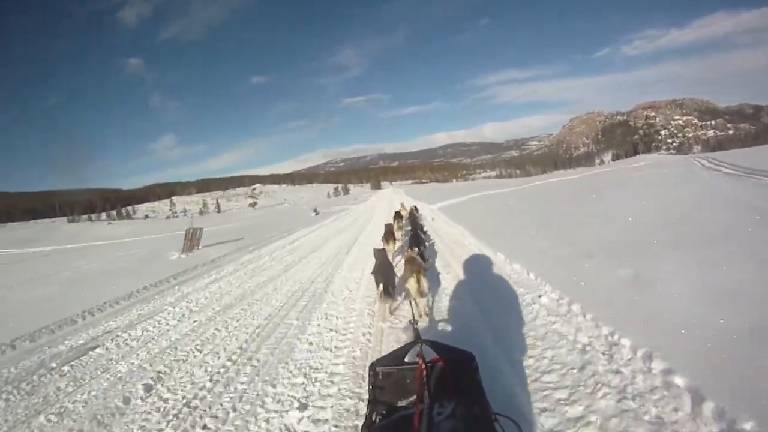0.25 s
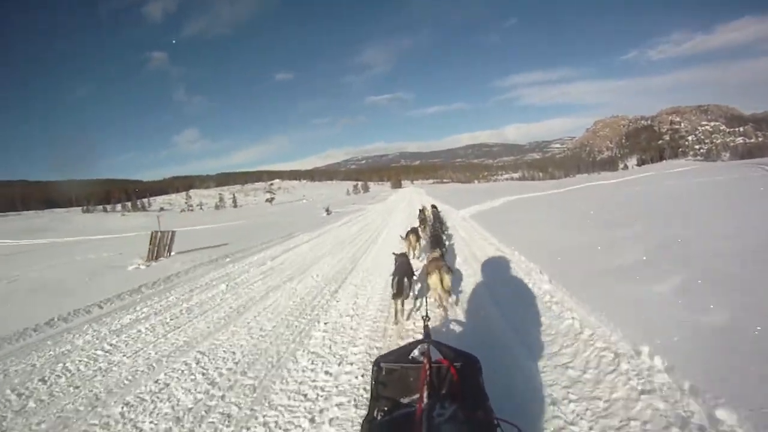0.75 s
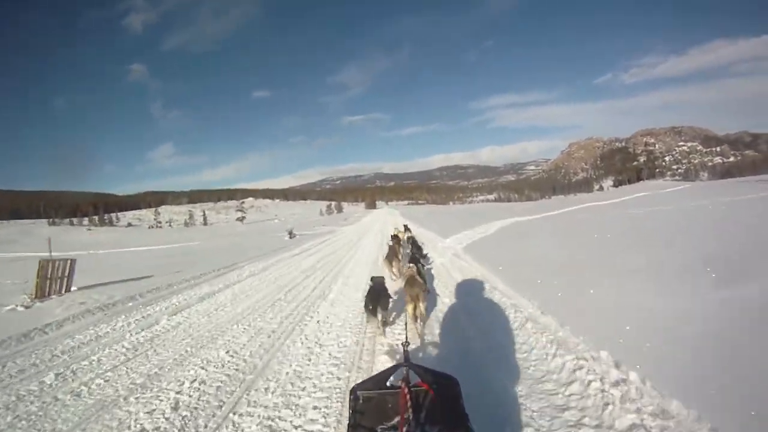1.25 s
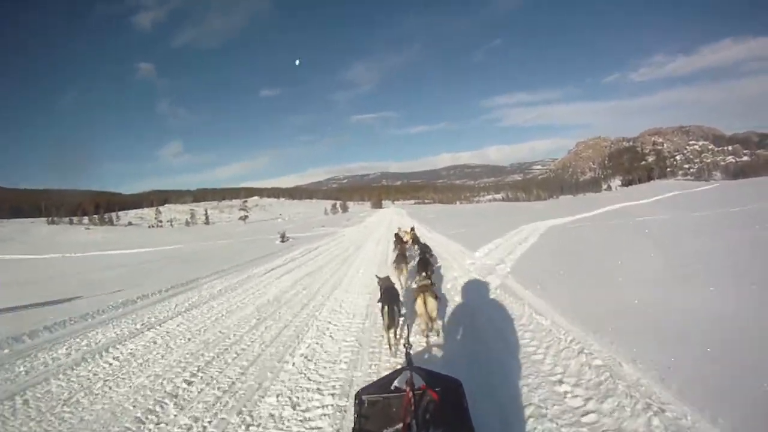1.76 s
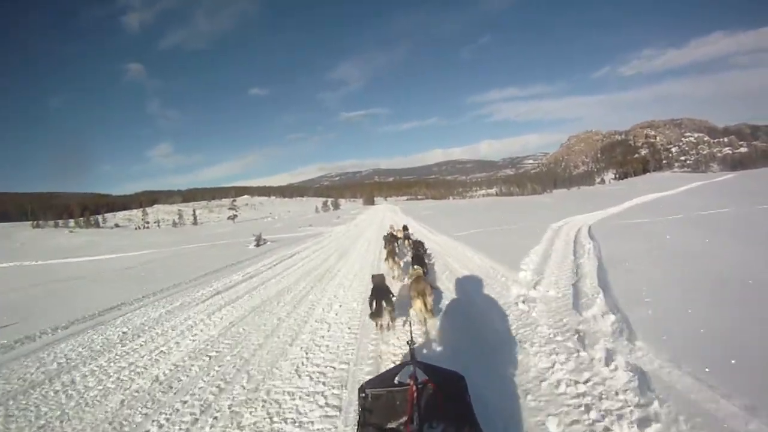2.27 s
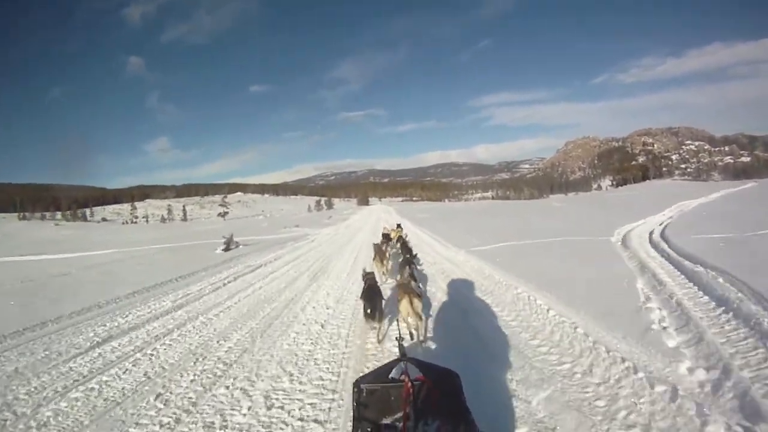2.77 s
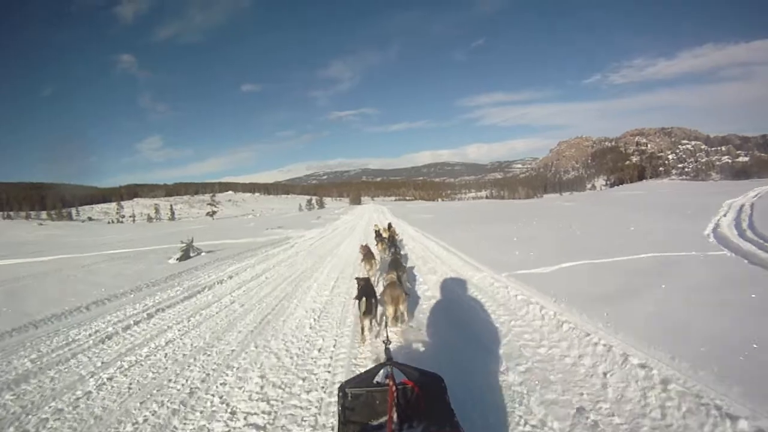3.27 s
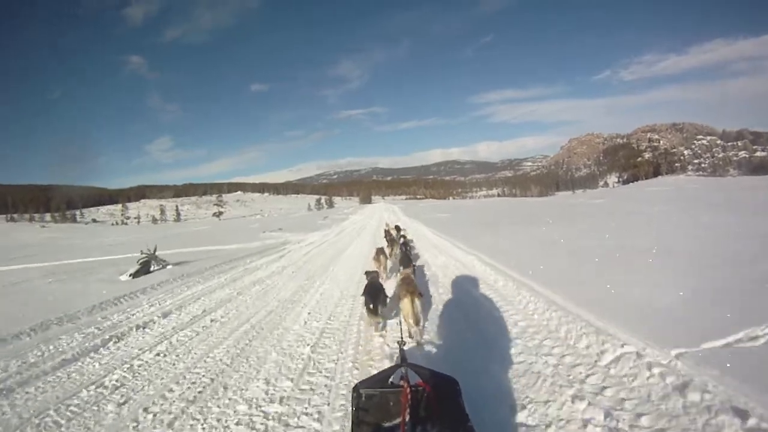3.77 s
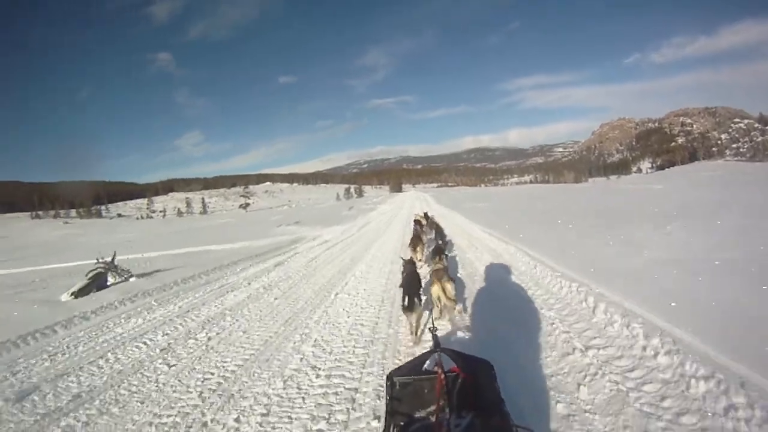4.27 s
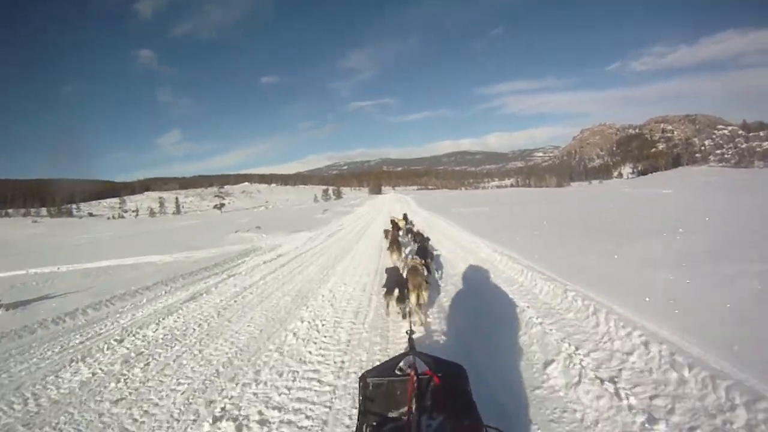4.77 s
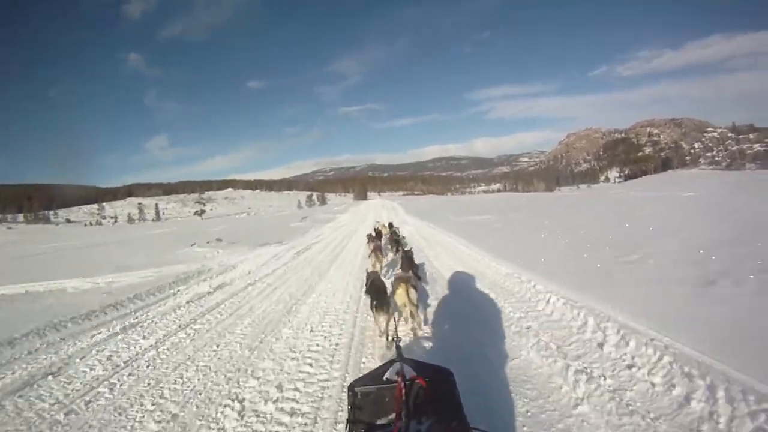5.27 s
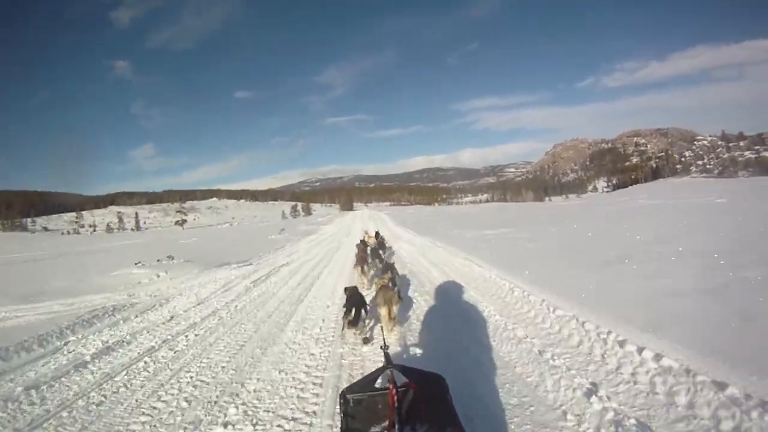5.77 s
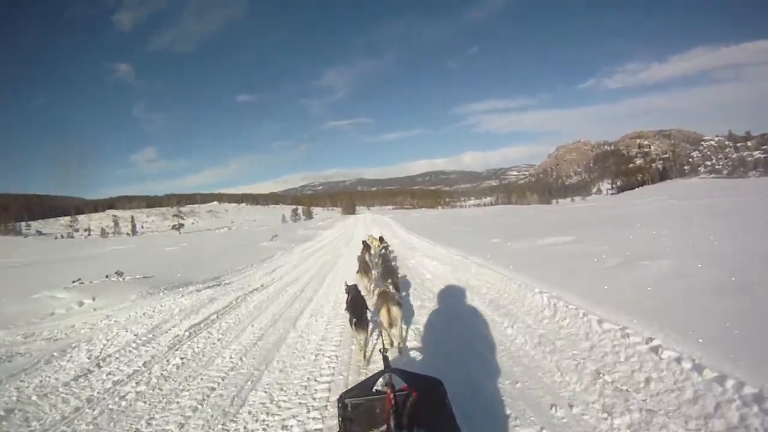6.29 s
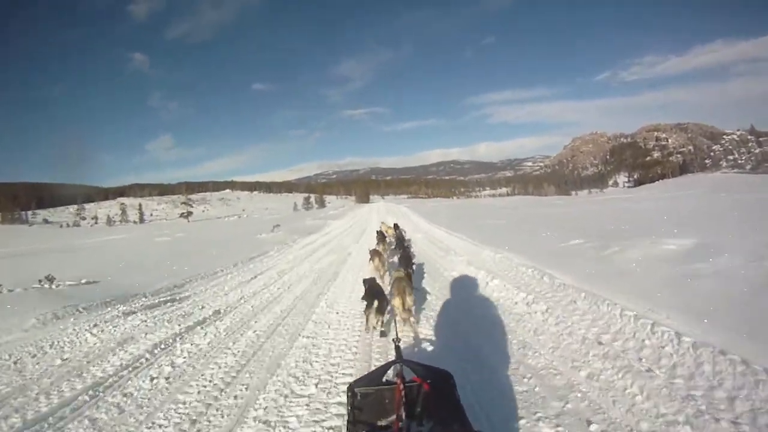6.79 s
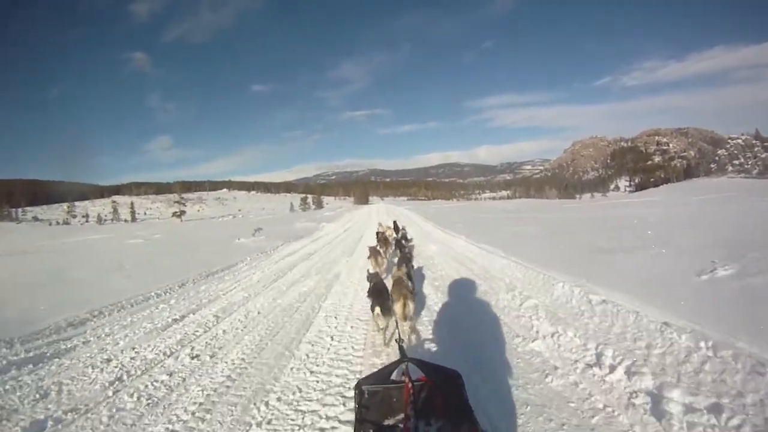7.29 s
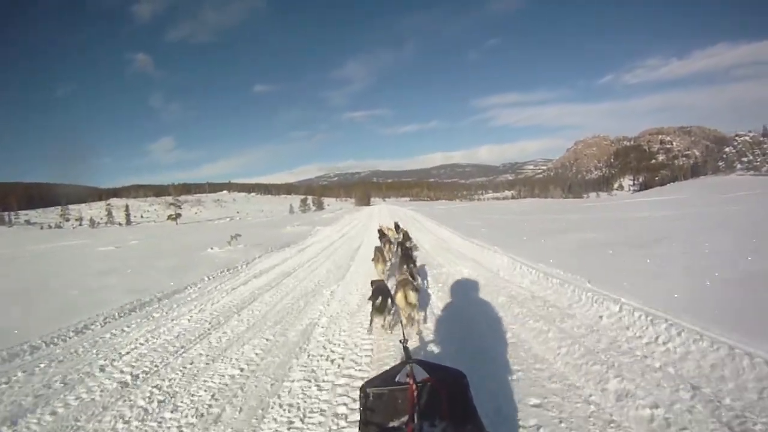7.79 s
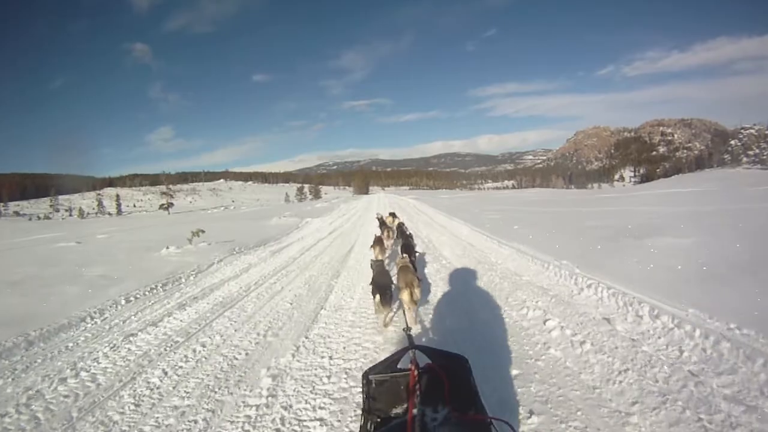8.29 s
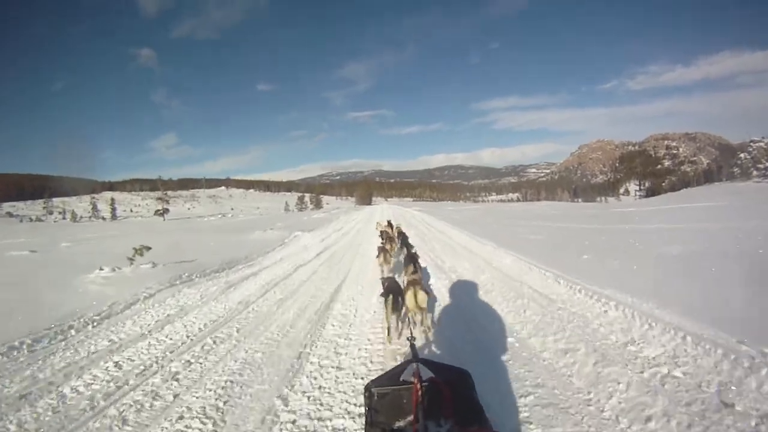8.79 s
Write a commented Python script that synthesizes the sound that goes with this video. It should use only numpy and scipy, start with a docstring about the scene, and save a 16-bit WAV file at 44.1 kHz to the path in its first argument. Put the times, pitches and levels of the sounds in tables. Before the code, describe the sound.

A close, hollow-sounding microphone in a plastic case rides on a dog sled over open snow. Throughout about nine seconds, runners grind and rush with a gritty midrange hiss, fine powder spray and a faint, unsteady singing tone, swaying slightly as the team tugs. Below, the frame drums softly and wind rumbles and buffets the case. A soft thud comes at 0.1, crunches and a clack near 1.1 to 1.3, and harder bites into snow around 2.4. From 2.7 to 5 the trail roughens: clustered muffled rut thuds, strongest near 3.5 and 4.8, frame booms, knocks and crackling crust with small metallic rings. Gusts swell near 5.7. Thumps return at 6.3 to 7, with one dry icy tick at 6.6. Then it is sparser: a thud at 7.9, a knock at 8.3, low booms near 8.7 to 8.8, and the glide continues. A thin treble fizz overlays everything.

```python
"""Sled runners grind, hiss and sing over packed snow, heard from a camera in a plastic case on a dog sled.
Filtered noise and grains make the grinding, the powder spray and the drumming frame.
Decaying noise and modes make the rut thuds, crunches, knocks and metal ticks; slow-changing noise makes the wind.
The case adds a hollow resonance, and a low-rate sample and hold mirrors the sound into a thin treble fizz."""
import sys
import numpy as np
from scipy import signal
from scipy.fft import irfft, next_fast_len
from scipy.io import wavfile
from scipy.ndimage import uniform_filter1d

SR = 44100
rng = np.random.default_rng(int(sys.argv[2]) if len(sys.argv) > 2 else 0)


def materialize(psi):
    """Save the field psi as 16-bit PCM at rate SR to the path in sys.argv[1].

    A 1-D psi becomes a single channel; in a 2-D psi each row is a channel.
    """
    bounded = np.clip(np.atleast_2d(psi).T, -1, 1)
    quanta = np.round(bounded * 32767).astype(np.int16)
    wavfile.write(sys.argv[1], SR, quanta)


N = 398663
TIME = np.arange(N) / SR  # s

# All levels in the tables are relative; some layers add a trim.
# grinding under the runners: (time [s], level [dB])
GRIND_CURVE = [(0.0, -48.5), (0.36, -53.8), (1.08, -53), (1.27, -50), (1.63, -52), (2.35, -48), (3.25, -54),
               (3.8, -49), (3.98, -51), (6.87, -50), (7.05, -51.5), (7.23, -53), (8.68, -48.5), (9.04, -49)]
# spectrum of the grinding: (frequency [Hz], density [dB per Hz])
RUNNER_SPECTRUM = [(150, -23.5), (500, 5), (700, 0.5), (900, 5.5), (1350, 1), (2000, -3), (2320, 1.5),
                   (2430, -10), (3000, -1), (4500, -23), (6000, -33)]
# hollow resonance of the case: (frequency [Hz], width of one filter pass [Hz], level [dB])
CASE_RESONANCE = (1033, 168, -4)
# a runner bites into the snow and scrapes harder for a moment: (time [s], extra drag [dB])
BITE_EVENTS = [(0.1, 3), (1.11, 2), (2.42, 3.5), (3.02, 2), (3.75, 1), (5.94, 1), (7.5, 2.5), (8.33, 0.5)]
# faint singing of the runners as they stick and slip: (time [s], level [dB])
SING_CURVE = [(0.0, -49.5), (0.9, -51), (1.27, -53.5), (2.35, -50), (2.89, -50.5), (3.07, -47), (3.8, -48),
              (4.16, -53), (4.34, -49.5), (5.6, -50), (5.79, -48.5), (6.87, -51), (8.32, -48), (9.04, -51)]
# resonances of the singing runners: (frequency [Hz], width of one filter pass [Hz], level [dB])
SING_RESONANCES = [(1663, 214, 0.5), (1837, 380, 1)]
# drag of the snow, which throws up spray and crumbs: (time [s], level [dB])
DRAG_CURVE = [(0.0, -53), (0.72, -53), (1.27, -54.5), (1.45, -53.5), (2.35, -53.5), (3.8, -51.5),
              (4.7, -53.5), (4.88, -50.5), (5.24, -53.5), (5.97, -52), (6.15, -53.5), (6.51, -54.5),
              (7.05, -53.5), (7.23, -53.5), (8.14, -52.5), (9.04, -53)]
# spectrum of the thrown powder: (frequency [Hz], density [dB per Hz])
POWDER_SPECTRUM = [(800, -38), (2200, -20), (2550, -6), (2900, 3.5), (3250, -2), (3700, -4.5), (4100, -4.5),
                   (5000, -8.5), (5600, -14.5), (6000, -22.5)]
# roughness of the trail, which shakes the frame: (time [s], level [dB])
SHAKE_CURVE = [(0.0, -39.5), (0.54, -40.5), (0.72, -39.5), (0.9, -40.5), (1.63, -40), (3.25, -37),
               (5.6, -38), (6.69, -40), (7.05, -39.5), (7.23, -40.5), (8.32, -39.5), (9.04, -38)]
# spectrum of the drumming frame: (frequency [Hz], density [dB per Hz])
FRAME_SPECTRUM = [(60, -17), (120, -8), (160, 0), (190, -1.5), (220, -4.5), (250, -6), (310, -10),
                  (410, -11.5), (520, -20.5), (700, -30), (1200, -31), (4000, -72.5)]
# lowest mode of the frame: (frequency [Hz], width of one filter pass [Hz], level [dB])
FRAME_BOOM = (205.5, 41, -5.5)
# the sled lurches and its frame booms: (time [s], level [dB])
LURCH_EVENTS = [(0.794, -32), (2.196, -28), (2.822, -25.5), (3.211, -26.5), (3.287, -31), (3.97, -24.5),
                (4.198, -24), (4.677, -29), (4.778, -27.5), (5.102, -28), (5.314, -25), (5.73, -26.5),
                (8.701, -27.5), (8.822, -23.5)]
# runners strike ruts: (time [s], thud level [dB], clack level [dB])
RUT_EVENTS = [(0.078, -17.5, -46), (1.249, -22, -36), (2.338, -21, -46), (2.671, -19, -44),
              (2.928, -20, -35.5), (3.015, -16, -40), (3.092, -19, -48), (3.439, -16, -35),
              (3.521, -13.5, -32.5), (3.785, -18, -35), (4.116, -19, -42), (4.38, -22, -39),
              (4.513, -20, -48), (4.783, -14.5, -45), (6.267, -17.5, -43), (6.426, -13.5, -36),
              (6.801, -34, -41), (6.955, -14, -31.5), (7.066, -35, -34.5), (7.856, -18, -34)]
# spectrum of a woody clack: (frequency [Hz], density [dB per Hz])
CLACK_SPECTRUM = [(150, -7), (350, -3.5), (550, -3), (750, -8.5), (1060, 0.5), (1400, -11), (2500, -14),
                  (5500, -27.5)]
# a loose joint knocks once against the case: (time [s], level [dB])
KNOCK_EVENTS = [(0.786, -36.5), (1.995, -35), (2.929, -36), (3.067, -32), (3.773, -39), (4.38, -31.5),
                (5.364, -30.5), (6.096, -35), (6.955, -32), (8.333, -30)]
# modes of a knock: (frequency [Hz], level [dB], 60 dB decay [s])
KNOCK_RING = [(420, -4, 0.013), (1100, -3, 0.024), (1670, -2, 0.031), (1910, -11, 0.01)]
# crust breaks and shakes the fittings: (time [s], level [dB], metal ring relative to crunch [dB])
CRUNCH_EVENTS = [(0.21, -46, -13), (0.895, -51, -15), (1.112, -43, -7), (1.13, -46, -12),
                 (1.2955, -47, -10), (1.7194, -48, -6), (2.0677, -50, -6), (2.202, -41, -11),
                 (2.513, -45, -11), (2.6174, -49, 4), (3.029, -48, 2), (3.0783, -44.5, -8),
                 (3.1732, -42, -3), (3.245, -44, -9), (3.387, -47, -8), (3.404, -43, -12),
                 (3.5613, -43, -12), (3.5942, -44.5, 0), (3.70, -48, -1), (3.8242, -43, -16),
                 (3.953, -42.5, -10), (4.133, -38.5, -17.5), (4.4864, -41.5, -20), (4.762, -49, -8),
                 (4.892, -48, -1), (4.962, -42, -2), (5.5363, -45.5, -10), (5.9565, -46, 2),
                 (5.9844, -45, -6), (6.3657, -49, 5), (7.066, -47.5, -9), (7.3407, -49, -6),
                 (7.4964, -46, -14), (8.1554, -47, -6), (8.2387, -44, -7), (9.019, -44.5, -4)]
# spectrum of breaking crust: (frequency [Hz], density [dB per Hz])
CRUST_SPECTRUM = [(500, -16), (1800, -1), (3200, 5.5), (4300, 3), (5200, 1.5), (6000, -8)]
# the hardware colours each crunch: (frequency [Hz], width [Hz], lift [dB])
HARDWARE_PEAKS = [(2210, 23, 13.5), (3255, 92, 12), (3620, 100, -14), (4230, 41, -13)]
# modes of the metal fittings: (frequency [Hz])
FITTING_MODES_HZ = [3234, 4222, 5513]
# strength of those modes, one row each: (level [dB], 60 dB decay [s])
FITTING_DECAYS = [(-8, 0.096), (2, 0.08), (-15, 0.11)]
# something small and hard, like a chip of ice, hits the case: (time [s], level [dB])
CHIP_EVENTS = [(6.6103, -33)]
# modes of the case struck by a chip: (frequency [Hz], level [dB], 60 dB decay [s])
CHIP_RING = [(1900, -2, .006), (2320, 0, 0.0056), (2760, 3.5, 0.0069), (3300, -15, 0.0028)]
# wind on the case: (time [s], level [dB])
GUST_CURVE = [(0.0, -32), (0.9, -40.5), (1.08, -32.6), (1.81, -37.5), (1.99, -34), (2.71, -34.5),
              (3.07, -32), (3.8, -31.5), (4.34, -37), (5.06, -32.8), (5.24, -33), (5.79, -29.9),
              (6.51, -36.5), (7.59, -33), (7.96, -35.5), (8.68, -33), (8.86, -38), (9.04, -34.5)]
# spectrum of the wind: (frequency [Hz], density [dB per Hz])
WIND_SPECTRUM = [(8, -17.5), (22, -4), (44, 0.5), (65, -3), (85, -5.5), (115, -10), (170, -22),
                 (400, -33.5), (1000, -94)]
# a strong eddy buffets the case: (time [s], extra wind [dB])
BUFFET_EVENTS = [(1.26, 3), (1.69, 5.5), (3.57, 4), (4.18, 2), (4.93, 4), (5.47, 2), (5.73, 3), (6.14, 2.5),
                 (6.27, 2), (7.86, 2.5), (8.54, 4.5), (8.69, 4.5)]

BITE_S, BUFFET_S = 0.082, 0.075  # lengths of the swells
CRUNCH_T60_S = 0.071
TUG_DB = 0.74  # rms swing as the team tugs unevenly
HOLD_HZ, EDGE_HZ = 12000, 15330  # sample-and-hold rate, upper band edge


def runners(load, trim_db=-2.5, rush_db=-1.2, load_db=2.0, grit_db=-2.0, judder_db=3.5):
    """Snow grains grind under the runners and sound through the hollow of the case."""
    friction = rng.standard_normal(N) + gain_of(grit_db) * grains(per_s=2500, spread_db=2.0)
    friction = friction * gain_of(load_db * load)
    rush = gain_of(rush_db) * coloured(friction, RUNNER_SPECTRUM)
    hz, width, db = CASE_RESONANCE
    juddering = friction * gain_of(judder_db * waver(16, 94))
    hollow = gain_of(db) * resonate(juddering, hz, width)
    return gain_of(trim_db) * level(GRIND_CURVE) * swells(BITE_EVENTS, BITE_S) * (rush + hollow)


def singing(load, load_db=0.9, slip_db=2.0):
    """Stick and slip feeds two close resonances in short spurts."""
    slips = gain_of(load_db * load + slip_db * waver(18, 83))
    tone = np.zeros(N)
    for hz, width, db in SING_RESONANCES:
        tone += gain_of(db) * resonate(rng.standard_normal(N) * slips, hz, width)
    return level(SING_CURVE) * swells(BITE_EVENTS, BITE_S) * evened(tone)


def spray(load, trim_db=-4.0, load_db=-0.3, puff_db=1.17, grit_db=-15.0, bite_share=0.22):
    """Powder is thrown up in uneven puffs, more of it where a runner bites."""
    powder = rng.standard_normal(N) + gain_of(grit_db) * grains(per_s=1100, spread_db=5.0)
    puffs = gain_of(load_db * load + puff_db * waver(15, 54))
    hiss = coloured(powder * puffs, POWDER_SPECTRUM)
    bites = swells(BITE_EVENTS, BITE_S) ** bite_share  # a share of the extra dB
    return gain_of(trim_db) * level(DRAG_CURVE) * bites * hiss


def frame(load, load_db=1.5, surge_db=1.5):
    """Small ridges in the trail drum on the frame, whose lowest mode booms in short surges."""
    bumps = grains(per_s=1100, spread_db=2.0) * gain_of(load_db * load)
    drumming = coloured(bumps, FRAME_SPECTRUM)
    hz, width, db = FRAME_BOOM
    surges = gain_of(surge_db * waver(4.5, 25))
    boom = gain_of(db) * resonate(rng.standard_normal(N) * surges, hz, width)
    return level(SHAKE_CURVE) * evened(drumming + boom)


def lurches(trim_db=-1.0, rise_s=0.007):
    """A lurch flexes the frame: its lowest mode swells and dies away."""
    t, out = np.arange(SR // 4) / SR, np.zeros(N)
    swell = t / rise_s * np.exp(1 - t / rise_s)  # reaches 1 at rise_s
    detunes = rng.uniform(-0.074, 0.036, len(LURCH_EVENTS))  # fractions of the pitch
    for (s, db), detune in zip(LURCH_EVENTS, detunes):
        hz = FRAME_BOOM[0] * (1 + detune)
        add(out, s, gain_of(db + trim_db) * swell * np.sin(2 * np.pi * hz * t))
    return out


def ruts(thud_db=-10.5, clack_db=-1.0, thud_t60=0.052, clack_t60=0.04, rise_s=0.0013):
    """A rut, cushioned by snow, gives a low thud in the frame and a short woody clack."""
    t, thuds, clacks = np.arange(SR // 4) / SR, np.zeros(N), np.zeros(N)
    onset = 1 - np.exp(-t / rise_s)
    for s, soft_db, hard_db in RUT_EVENTS:
        add(thuds, s, gain_of(soft_db + thud_db) * onset * decay(t, thud_t60))
        add(clacks, s, gain_of(hard_db + clack_db) * onset * decay(t, clack_t60))
    thud_noise = coloured(rng.standard_normal(N), FRAME_SPECTRUM)
    clack_noise = coloured(rng.standard_normal(N), CLACK_SPECTRUM)
    return thud_noise * thuds + clack_noise * clacks


def rattle(trim_db=-16.0):
    """Loose joints of the frame knock lightly; the rattle grows faster than the shaking."""
    shake = level(SHAKE_CURVE)
    taps = coloured(grains(per_s=70, spread_db=2.5), CLACK_SPECTRUM)
    return gain_of(trim_db) * shake * evened(shake) * taps


def knocks(trim_db=0.5, rise_s=0.00061):
    """One sharp push rings the hollow of the case for a few cycles."""
    t, out = np.arange(SR // 20) / SR, np.zeros(N)
    knock = ring(KNOCK_RING, t) * (1 - np.exp(-t / rise_s))
    for s, db in KNOCK_EVENTS:
        add(out, s, gain_of(db + trim_db) * knock)
    return out


def crunches(trim_db=-0.5, metal_db=-2.5, rise_s=0.001297):
    """Breaking crust gives way over a few milliseconds; the jolt sets metal fittings ringing."""
    t, bursts, metal = np.arange(SR // 3) / SR, np.zeros(N), np.zeros(N)
    clink = fitting_ring(t)
    for s, db, ring_db in CRUNCH_EVENTS:
        onset = gain_of(db) * (1 - np.exp(-(t / rise_s) ** 2))
        add(bursts, s - rise_s, onset * decay(t, CRUNCH_T60_S))
        add(metal, s - rise_s, onset * gain_of(ring_db) * clink)
    crackle = coloured(grains(per_s=3000, spread_db=0.5), CRUST_SPECTRUM, HARDWARE_PEAKS)
    return gain_of(trim_db) * bursts * crackle + gain_of(metal_db) * metal


def crumbs(trim_db=-12.0, length_s=0.0051):
    """Small lumps of snow are crushed at random, in bursts of noise under smooth windows."""
    sizes = abs(grains(per_s=33, spread_db=1.0))
    window = signal.windows.hann(round(3 * length_s * SR))
    bursts = signal.oaconvolve(sizes, window)[:N]
    crackle = coloured(rng.standard_normal(N), CRUST_SPECTRUM, HARDWARE_PEAKS)
    return gain_of(trim_db) * level(DRAG_CURVE) * evened(bursts * crackle)


def jingle(trim_db=-20.0):
    """The fittings tick faintly all along the trail, each tick ringing their modes."""
    clink = fitting_ring(np.arange(SR // 3) / SR)
    ticks = signal.oaconvolve(grains(per_s=7.8, spread_db=-0.5), clink)[:N]
    return gain_of(trim_db) * level(DRAG_CURVE) * evened(ticks)


def chips(trim_db=6.0, rise_s=0.00016, bounce_s=0.00285, bounce_db=-16.0):
    """A hard chip strikes the modes of the case: a dry tick with one small bounce."""
    t, out = np.arange(SR // 20) / SR, np.zeros(N)
    tick = ring(CHIP_RING, t) * (1 - np.exp(-(t / rise_s) ** 2))
    for s, db in CHIP_EVENTS:
        add(out, s, gain_of(db + trim_db) * tick)
        add(out, s + bounce_s, gain_of(db + trim_db + bounce_db) * tick)
    return out


def wind(steady_s=0.21, steadiness=0.35):
    """Eddies push on the case with a fairly even force; a few buffet it harder."""
    air = coloured(rng.standard_normal(N), WIND_SPECTRUM)
    power = abs(uniform_filter1d(air ** 2, round(steady_s * SR))) + 1e-6
    steadied = evened(air / power ** (steadiness / 2))  # partly evens out the force
    return level(GUST_CURVE) * swells(BUFFET_EVENTS, BUFFET_S) * steadied


def gain_of(db):
    """Turns dB into an amplitude factor."""
    return 10 ** (np.asarray(db) / 20)


def evened(x):
    """Scales to rms 1."""
    return x / np.sqrt(np.mean(x ** 2) + 1e-20)


def level(rows):
    """Turns a dB curve into a gain for every sample."""
    return gain_of(np.interp(TIME, *np.transpose(rows)))


def swells(rows, length_s):
    """A gain that swells smoothly for a moment at each (time [s], lift [dB])."""
    return gain_of(sum(db * np.exp(-(2 * (TIME - s) / length_s) ** 2) for s, db in rows))


def decay(t, t60):
    """An exponential decay that falls 60 dB in t60 seconds."""
    return gain_of(-60 * t / t60)


def add(mix, s, sound):
    """Mixes a sound in at time s."""
    part = mix[max(round(s * SR), 0):][:len(sound)]
    part += sound[:len(part)]


def coloured(x, points, peaks=(), size=8192):
    """Causal minimum-phase filter from a spectrum plus resonances; the result has rms 1."""
    hz = abs(np.fft.fftfreq(size, 1 / SR))
    f, value = np.transpose(points)
    db = np.interp(np.log(hz + 1), np.log(f + 1), value)
    for centre, width, lift in peaks:
        db = db + lift / (1 + (2 * (hz - centre) / width) ** 2)
    # the Hilbert transform of the log gain gives the minimum phase
    response = np.exp(np.conj(signal.hilbert(np.log(gain_of(db)))))
    taps = np.fft.ifft(response).real
    return evened(signal.oaconvolve(x, taps[:size // 2])[:N])


def resonate(x, hz, width):
    """Two passes of a resonance give steep skirts; the result has rms 1."""
    b, a = signal.iirpeak(hz, hz / width, fs=SR)
    once = signal.lfilter(b, a, x)
    return evened(signal.lfilter(b, a, once))


def waver(slow_hz, fast_hz):
    """Random drift of rms 1, equally strong in each octave between two rates."""
    hz = np.fft.rfftfreq(next_fast_len(N), 1 / SR) + 1e-6
    shape = 1 / np.sqrt(hz * (1 + (slow_hz / hz) ** 4) * (1 + (hz / fast_hz) ** 4))
    phases = np.exp(2j * np.pi * rng.random(len(hz)))
    return evened(irfft(shape * phases)[:N])


def grains(per_s, spread_db):
    """Random clicks of either sign with exponentially spread dB sizes; the result has rms 1."""
    size = gain_of(spread_db * np.minimum(rng.exponential(1, N), 4))
    sign = rng.choice([-1, 1], N)
    strikes = rng.random(N) < per_s / SR
    return evened(size * sign * strikes)


def ring(modes, t):
    """The dying modes of a struck thing."""
    return sum(gain_of(db) * decay(t, t60) * np.sin(2 * np.pi * hz * t) for hz, db, t60 in modes)


def fitting_ring(t):
    """The dying modes of the metal fittings."""
    return ring(np.column_stack([FITTING_MODES_HZ, FITTING_DECAYS]), t)


def scene():
    """One wavering load from the uneven trail drives the runners, their singing, the spray and the frame."""
    load = waver(8, 79)
    tugs = gain_of(TUG_DB * waver(2.6, 7.4))  # the snow hisses harder with each tug
    glide = tugs * (runners(load) + singing(load) + spray(load))
    sled = frame(load) + lurches() + ruts() + rattle() + knocks() + jingle()
    snow = crunches() + crumbs() + chips()
    return (glide + sled + snow + wind())[None]


def record(dry):
    """Sample and hold mirrors the spectrum above half the hold rate; then a low-pass limits the band."""
    slow = signal.resample_poly(dry, HOLD_HZ, SR, axis=1)
    steps = np.repeat(slow, 4, axis=1)  # each sample is held for four
    held = signal.resample_poly(steps, SR, 4 * HOLD_HZ, axis=1)[:, :N]
    low_pass = signal.firwin(511, EDGE_HZ, window=("kaiser", 9), fs=SR)
    return signal.oaconvolve(held, low_pass[None], "same")


dry = scene()
out = record(dry)
materialize(out)
```